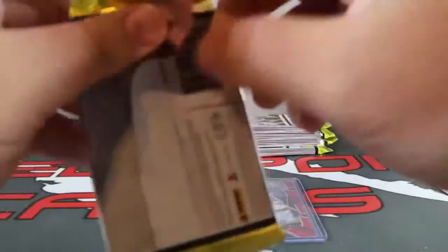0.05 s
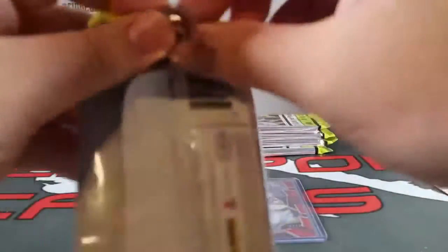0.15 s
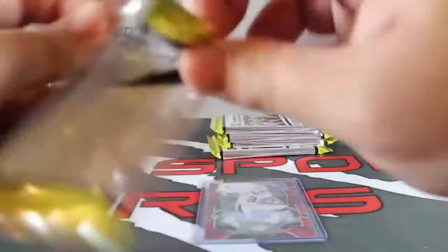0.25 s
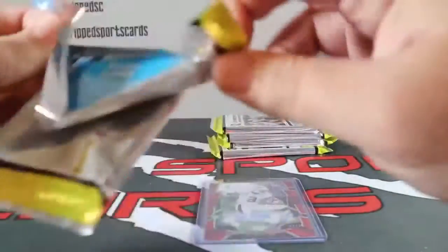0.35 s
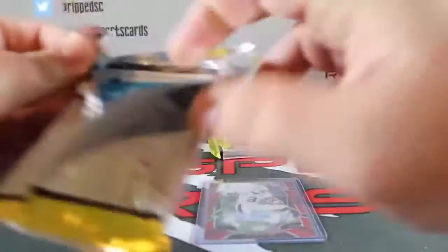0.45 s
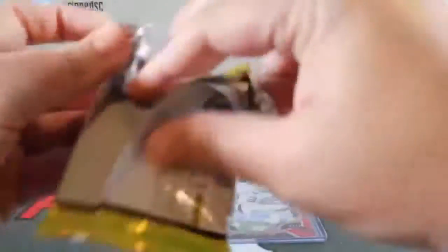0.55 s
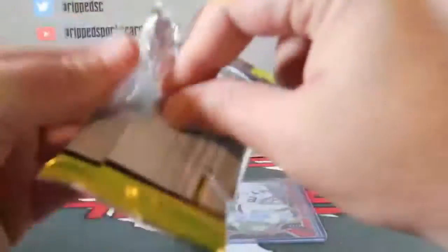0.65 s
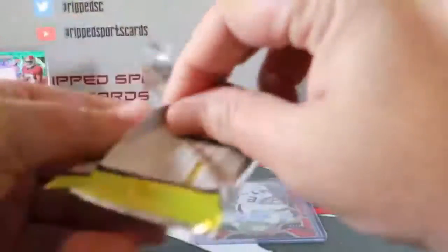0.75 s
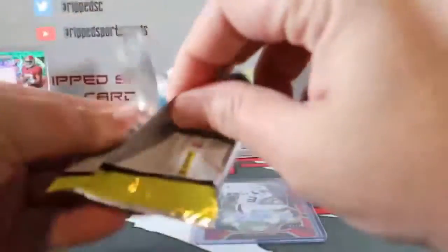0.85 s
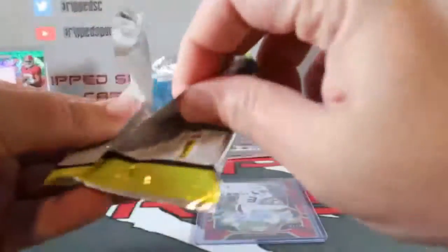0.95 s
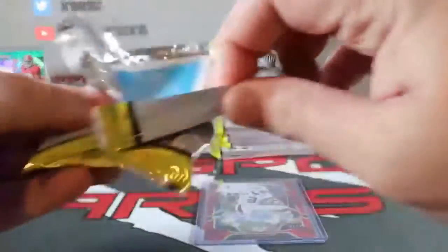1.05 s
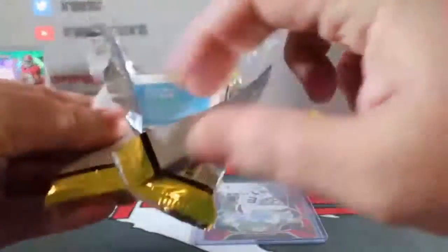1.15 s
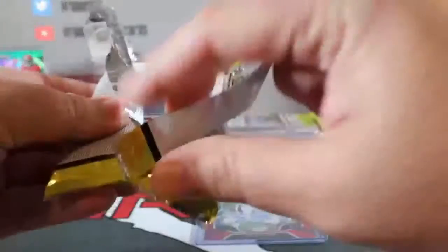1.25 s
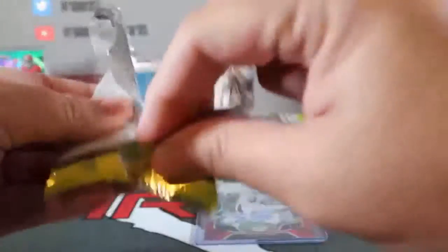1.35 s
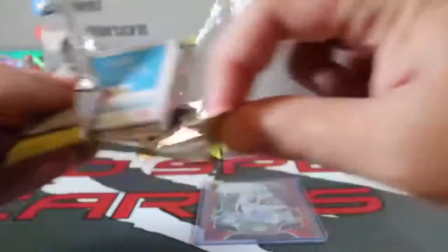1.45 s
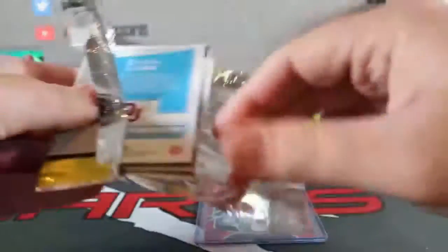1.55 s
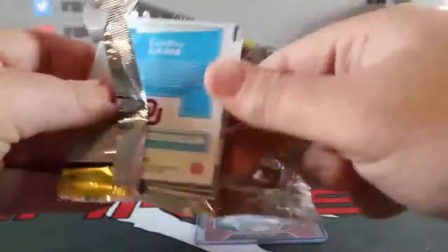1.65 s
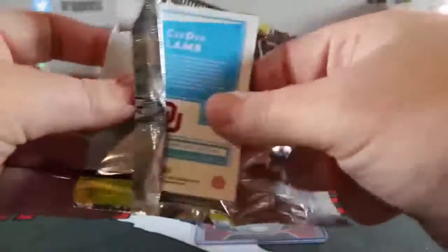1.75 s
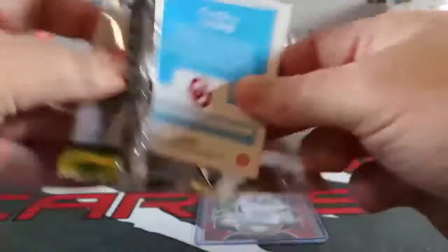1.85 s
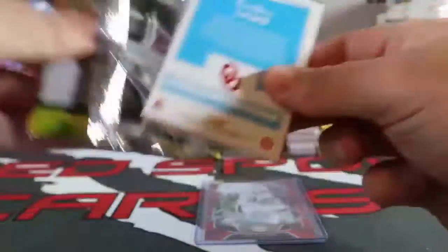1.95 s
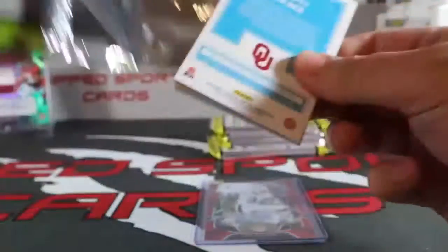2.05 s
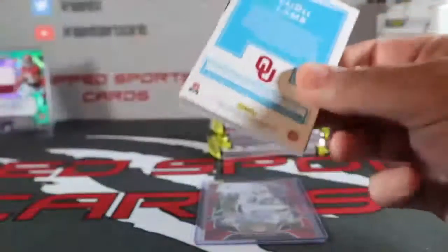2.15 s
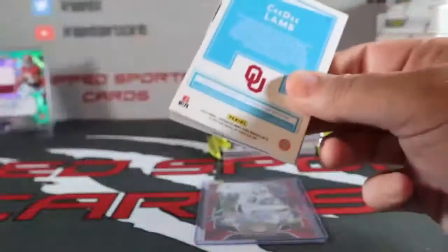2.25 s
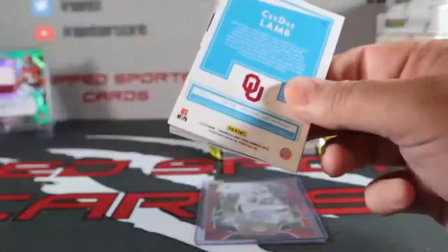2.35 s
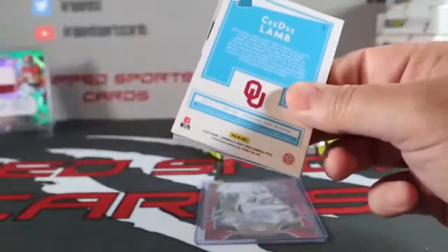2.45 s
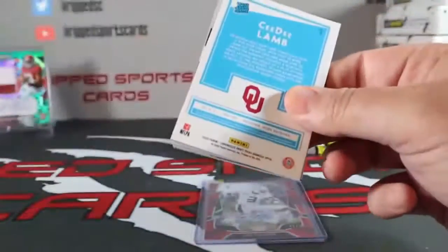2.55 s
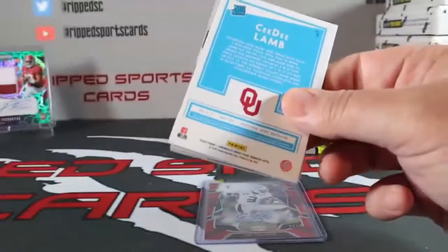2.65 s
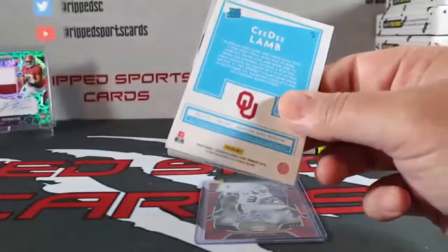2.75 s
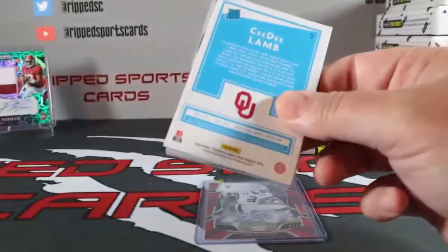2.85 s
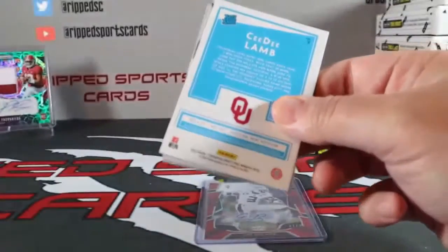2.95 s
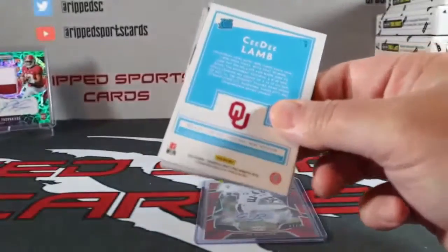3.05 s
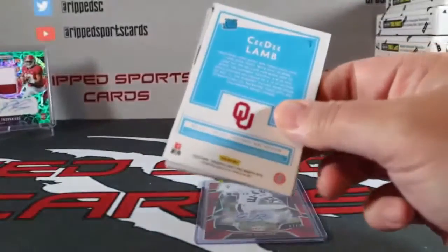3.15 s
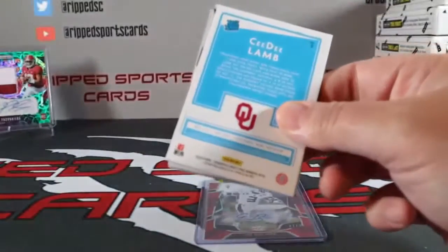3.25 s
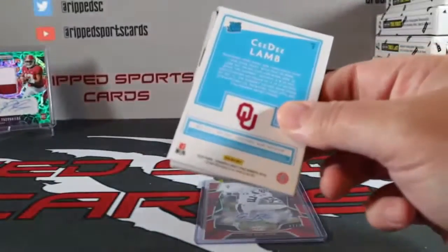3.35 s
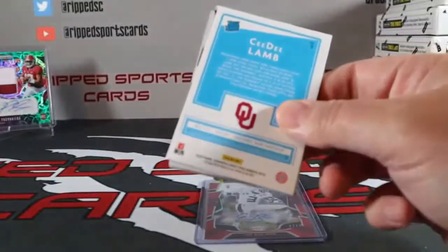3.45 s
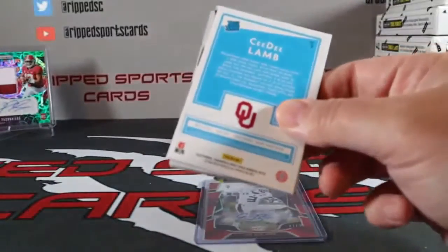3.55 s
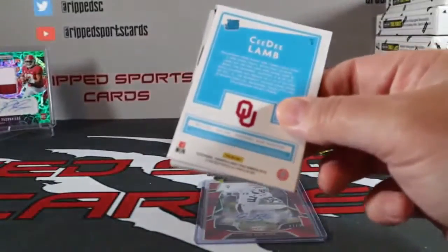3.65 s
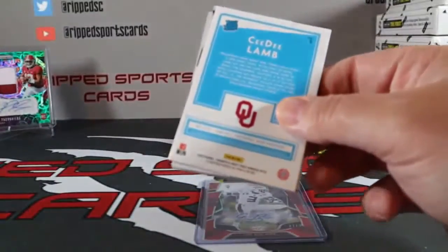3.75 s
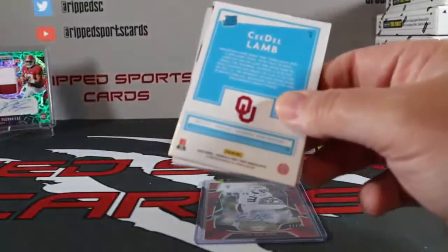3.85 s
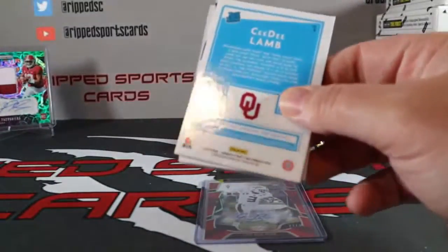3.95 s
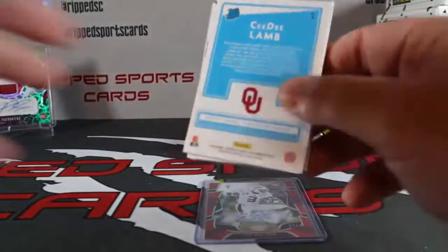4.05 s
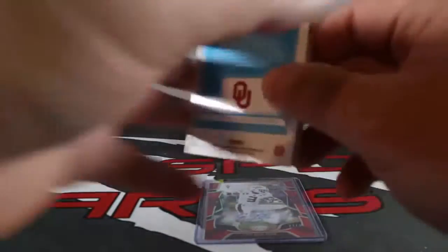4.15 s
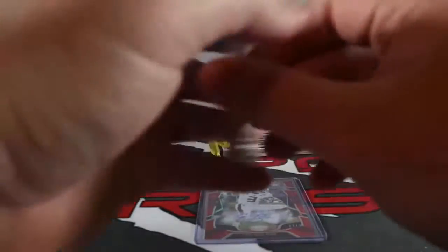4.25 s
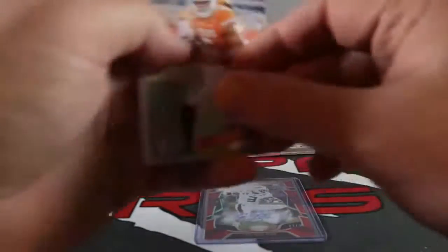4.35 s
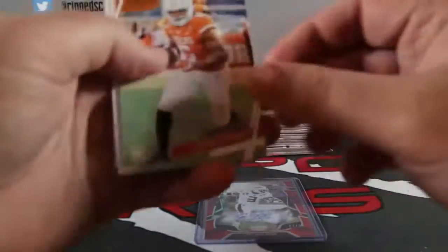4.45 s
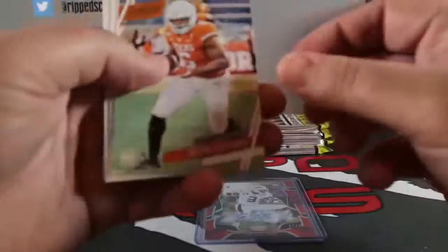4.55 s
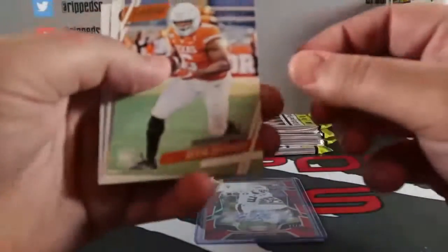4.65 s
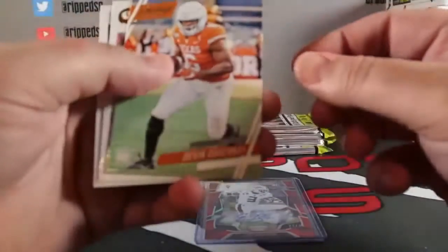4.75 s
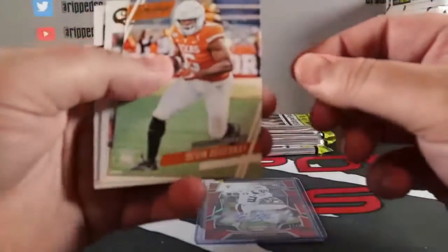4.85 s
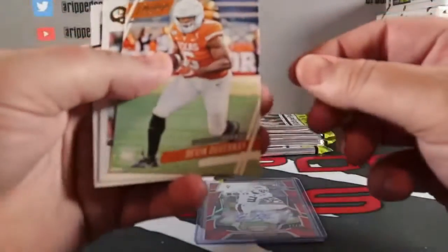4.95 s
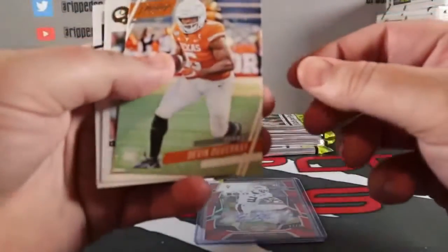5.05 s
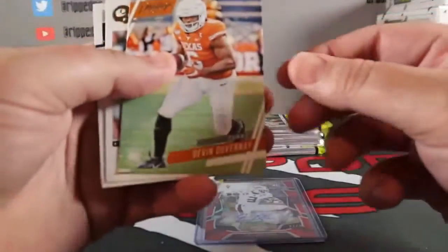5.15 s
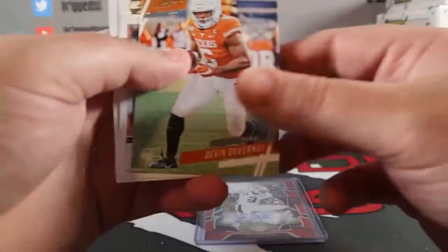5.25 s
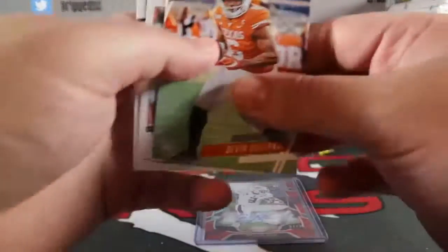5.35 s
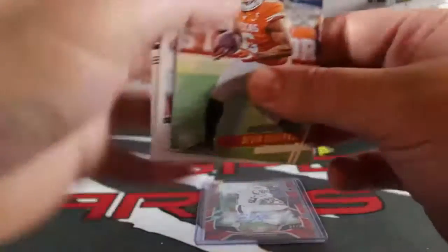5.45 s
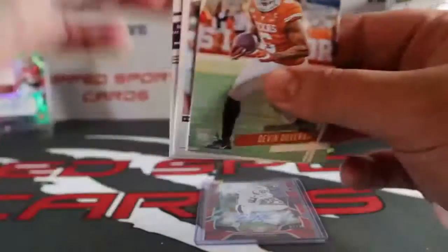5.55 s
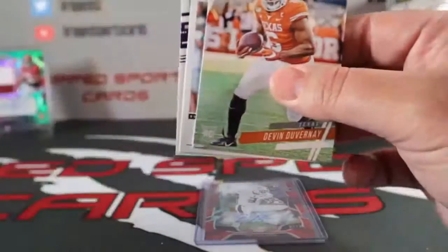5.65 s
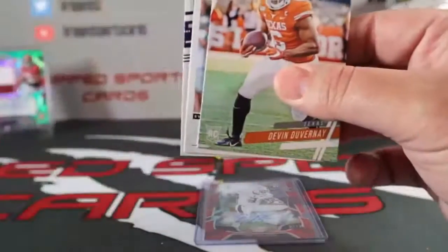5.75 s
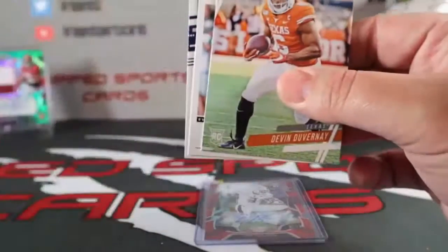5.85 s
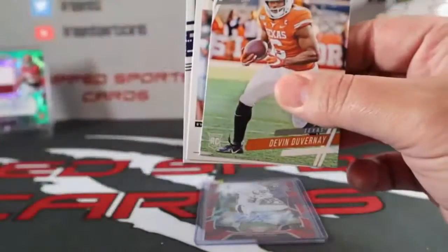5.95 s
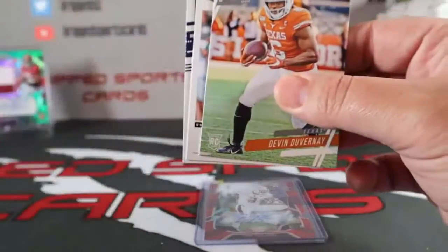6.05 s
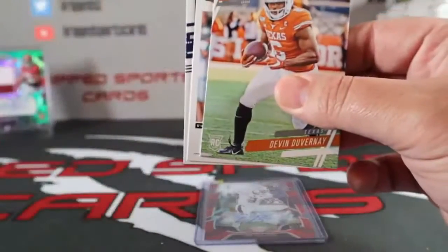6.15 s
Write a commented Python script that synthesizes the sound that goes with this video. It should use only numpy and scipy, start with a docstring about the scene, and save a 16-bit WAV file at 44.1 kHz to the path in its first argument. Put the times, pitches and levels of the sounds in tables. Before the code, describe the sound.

Loud, crisp foil crinkling opens the scene in uneven bursts, with hollow pouch rustle beneath the snaps. After about two seconds it gives way to quiet handling of stiff coated cards: ticks, a muffled double thud on the table, brief brushing slides and barely audible squeaks. The small room answers with short reflections; low room tone and a faraway motor hum remain, heard through a close phone.

```python
"""In a small room with a near wall, a foil card pack is torn open by hand close to a phone; a fan hums far off.
The film buckles in sharp snaps, each a filtered noise burst, over a dense crackle of decaying noise grains.
Then the cards are squared, tapped and slid: soft strokes of hiss, narrow squeaks, and thuds that ring a table.
Delayed copies and a decaying noise tail form the room's answer."""
import sys
import numpy as np
from scipy import signal
from scipy.fft import rfft, irfft, next_fast_len
from scipy.io import wavfile
from scipy.ndimage import uniform_filter1d, map_coordinates

SR = 44100
rng = np.random.default_rng(int(sys.argv[2]) if len(sys.argv) > 2 else 0)


def bounce(signal):
    """Save signal as a 16-bit WAV file at the path given by the first command-line argument."""
    frames = np.transpose(np.atleast_2d(signal))
    limited = np.clip(frames, -1, 1)
    pcm = np.round(limited * 32767).astype(np.int16)
    wavfile.write(sys.argv[1], SR, pcm)


N = 274294

# Colour of sound radiated by the thin surface. Each row: frequency in Hz, relative level in dB.
FILM = [(250, -39), (1300, -14.5), (2300, 0), (3200, -7), (4000, -1), (5200, -5), (6700, -2), (7700, -6),
        (8800, -2.5), (11000, -5), (15000, -7.5)]
# Resonances of the hollow pouch. Each row: frequency in Hz, relative level in dB.
POUCH = [(150, -40.5), (400, -12.5), (510, -15.5), (650, -7), (950, -3.5), (1300, 3), (1550, -4),
         (2200, -20.5)]


def amp(db):
    """Level to amplitude: 20 dB is a factor of ten."""
    return 10 ** (np.asarray(db) / 20)


def unit(x):
    """Normalisation to unit root-mean-square amplitude."""
    return x / np.sqrt(np.mean(x ** 2) + 1e-20)


def along(points, hz):
    """Interpolation of (Hz, value) points on a logarithmic frequency axis."""
    f, v = np.transpose(points)
    return np.interp(np.log(hz + 1), np.log(f + 1), v)


def wobble(rate):
    """Slow random modulation: a smooth curve through rate random knots a second."""
    knots = rng.standard_normal(int(N * rate / SR) + 4)
    return map_coordinates(knots, [np.arange(N) * rate / SR])


def filtered(x, response):
    """Linear filtering: the spectrum of x is multiplied by a function of frequency in Hz."""
    m = next_fast_len(x.shape[-1] + 8192)
    spectrum = rfft(x, m) * response(np.fft.rfftfreq(m, 1 / SR))
    return irfft(spectrum, m)[..., :x.shape[-1]]


def coloured(x, spectrum):
    """Minimum-phase filtering: a folded cepstrum gives the (Hz, dB) shape a causal response."""
    ceps = irfft(np.log(amp(along(spectrum, np.fft.rfftfreq(4096, 1 / SR)))))
    ceps[1:2048] *= 2
    ceps[2049:] = 0
    impulse_response = irfft(np.exp(rfft(ceps)))
    return signal.fftconvolve(x, impulse_response)[:len(x)]


def treble(x, above_hz):
    """High-pass filtering: the top part of x alone."""
    return filtered(x, lambda hz: 1 / (1 + (above_hz / (hz + 1)) ** 4))


def stroke(start, swell, fade):
    """Envelope of a gesture: a smooth swell, then a near-exponential death of 60 dB within fade (all s)."""
    t = np.arange(N) / SR - start
    rise = np.sin(np.pi / 2 * np.clip(t / abs(swell), 0, 1)) ** 2
    since_peak = np.clip(t - abs(swell), 0, None)
    return rise * amp(-60 * (since_peak / abs(fade)) ** 1.069)


def patchy(x, depth_db):
    """Varying resonance: colour drifts in narrow streaks, as parts of a surface ring for a while."""
    z = signal.stft(x, nperseg=512)[2]
    field = uniform_filter1d(rng.standard_normal(z.shape), size=4, axis=0)  # across frequency
    field = uniform_filter1d(field, size=9, axis=1)  # across time
    return signal.istft(z * amp(depth_db * unit(field)), nperseg=512)[1][:N]


def grains(per_s, spread_db, life_s, clump_db):
    """Stick-slip friction: tiny slips at random moments make noise that decays to 1/e in life_s."""
    sizes_db = spread_db * np.minimum(rng.exponential(size=N), 3)
    kicks = (rng.random(N) < per_s / SR) * amp(sizes_db)
    shape = signal.lfilter([1], [1, -np.exp(-1 / (abs(life_s) * SR))], kicks)
    return unit(shape * amp(clump_db * wobble(45)) * rng.standard_normal(N))


def clicks(rows, focus, gain_db, boom_db):
    """Impulsive excitation: a sharp crack and weaker rattle peak round a centre and boom in the hollow."""
    crack_s, rattle_s, rattle_db = .004, .016, -10  # times to die 60 dB; rattle re crack
    skin, body, t = np.zeros(N + SR), np.zeros(N + SR), np.arange(SR // 40) / SR
    decay = amp(-60 * t / crack_s) + amp(rattle_db - 60 * t / rattle_s)
    shape = (1 - np.exp(-t / .0002)) * decay
    for s, db, centre_hz in rows:
        burst = shape * rng.standard_normal((2, len(t)))
        tone = signal.lfilter(*signal.iirpeak(centre_hz, focus, SR), burst[0]) + 0.4 * burst[0]
        at = round(s * SR)
        skin[at:][:len(t)] += amp(db) * tone / np.linalg.norm(tone)
        body[at:][:len(t)] += amp(db) * burst[1] / np.linalg.norm(burst[1])
    return amp(gain_db) * coloured(skin[:N], FILM) + amp(boom_db) * coloured(body[:N], POUCH)


def background():
    """Steady broadband and tonal noise: stirring room tone, wavering motor hum, rumble through the phone stand."""
    # Room tone. Each row: frequency in Hz, relative spectral level in dB.
    air_colour = [(24, -34), (60, -8), (124, -8), (199, -13), (290, -11), (372, -18.5), (479, -15),
                  (700, -23), (1300, -26.5), (2000, -34.5), (3300, -40.5), (7500, -43), (9000, -41),
                  (16000, -41.5)]
    # Motor partials. Each row: frequency in Hz, level in dB before a common 4 dB gain.
    hum_partials = [(123.8, -76.5), (484.5, -85), (620, -86.5)]
    # The phone is jostled. Each row: start in seconds, rumble level in dB.
    jolts = [(.15, -48), (.85, -65), (1.0, -65), (1.42, -59), (4.2, -75), (5.2, -74), (5.95, -67)]
    air_db = -69
    stir = patchy(rng.standard_normal(N), depth_db=1.5)
    air = unit(filtered(stir, lambda hz: amp(along(air_colour, hz))))
    air = amp(air_db + 4.2 * wobble(7)) * air
    turn = 2 * np.pi * np.arange(N) / SR  # phase of 1 Hz
    hum = sum(amp(db + 4 + 1 * wobble(5.6)) * np.sin(hz * turn + 0.89 * wobble(1.7)) for hz, db in hum_partials)
    rumble = unit(filtered(rng.standard_normal(N), lambda hz: hz / (hz + 15) / (1 + (hz / 36) ** 6)))
    jostling = sum(amp(db) * stroke(s, swell=0.072, fade=0.3) for s, db in jolts)
    return air + hum + rumble * (amp(-90) + jostling)


def foil():
    """Buckling of a thin film: snaps stand out of a crackle of creases, heard through film and hollow pouch."""
    # The hands pull, tear and crush the foil.
    # Each row: start in seconds, crackle level in dB, fade in seconds, pouch boom re crackle in dB.
    pulls = [(-.02, -30.5, 0.17, -8.5), (.044, -34.5, 1, -17.5), (.104, -23, 0.63, -8),
             (.178, -17.5, 0.14, -2), (.208, -22, 0.073, -3.5), (.3, -52, 0.094, -20),
             (.383, -30, 0.52, -7), (.461, -36.5, 0.21, -10), (.58, -37, 0.37, -6.5), (.65, -42.5, 1, -8),
             (.742, -38, 0.065, 1), (0.84, -27, 0.3, -5), (.875, -19, 0.31, -1.5), (.905, -21.5, 0.054, 4),
             (1.024, -35.5, 0.24, 4.5), (1.152, -44, .2, -1.5), (1.195, -27.5, 0.33, -9.5),
             (1.264, -22, 0.46, -5), (1.333, -20.5, 0.3, -1.5), (1.439, -33.5, 0.18, -2),
             (1.508, -31, 0.21, -5), (1.57, -35.5, 0.24, -17), (1.72, -39.5, 0.44, -13),
             (1.802, -52, 0.54, -7.5), (1.84, -57.5, 0.13, 5.5), (1.95, -56.5, 0.35, -4),
             (2.107, -53, 0.15, -6.5)]
    # Single buckles. Each row: time in seconds, level in dB before the click gains, centre in Hz.
    snaps = [(0.0229, -23.5, 4350), (0.0313, -19.5, 5240), (0.0528, -19, 8120), (0.0663, -13.5, 8010),
             (0.0963, -10, 10500), (0.1084, -9.5, 8410), (0.1166, -2.5, 7500), (0.1690, -6.5, 3960),
             (0.1850, 0, 3978), (0.3448, -22, 5230), (0.3869, -11, 4300), (0.3982, -15, 5400),
             (0.4134, -30, 6030), (0.4259, -14, 4260), (0.4765, -10, 2720), (0.4985, -15, 3385),
             (0.5279, -18.5, 6100), (0.5935, -15.5, 9700), (0.6320, -12.5, 6530), (0.6617, -10, 4285),
             (0.6985, -12.5, 8100), (0.7270, -18, 2716), (0.7544, -21, 4000), (0.7675, -16, 3216),
             (0.8042, -24.5, 4190), (0.8487, -13.5, 5200), (0.8574, -14.5, 6300), (0.8722, -8.5, 2606),
             (0.9404, -6.5, 8677), (0.9619, -10.5, 8070), (1.0432, -14.5, 5640), (1.0676, -10.5, 3703),
             (1.1727, -23.5, 6200), (1.1902, -12, 5646), (1.2140, -12.5, 2993), (1.2344, -12.5, 8080),
             (1.2565, -11.5, 6996), (1.2648, -14, 5640), (1.3301, 0, 7420), (1.3420, -6, 3300),
             (1.3522, -3, 5450), (1.3592, -3, 8000), (1.4502, -13, 5960), (1.5157, -4, 7090),
             (1.6735, -38, 4500), (1.7188, -10.5, 8200), (2.0097, -29.5, 9300), (2.2085, -54, 2870)]
    pull_swell_s, streak_db = .018, 4
    # treble re crackle; the empty wrapper is carried off and dulls
    bright_db, away_s, dulls_db_per_s = -1.1, 1.75, 74
    # harder pulls tear the seam: over this span the crackle fuses into a rip
    rip_from_db, rip_span_db = -31, 17.5

    def creases():
        return patchy(grains(per_s=460, spread_db=2.0, life_s=0.00066, clump_db=2.5), depth_db=streak_db)

    def tearing():
        return patchy(grains(per_s=2900, spread_db=3.5, life_s=0.0014, clump_db=1.0), depth_db=streak_db)

    # creases of each size pop at their own moments and pitch
    mixed = np.zeros(N)
    for centre_hz in (2300, 5500, 13000):
        mixed += filtered(creases(), lambda hz: np.exp(-np.log((hz + 1) / centre_hz) ** 2 / .6))
    skin, boom = unit(coloured(mixed, FILM)), unit(coloured(creases(), POUCH))
    top = treble(skin, above_hz=7000)
    away_for_s = np.clip(np.arange(N) / SR - away_s, 0, None)
    top_gain = amp(bright_db - dulls_db_per_s * away_for_s)
    skin = skin + (top_gain - 1) * top
    rip, rip_boom = unit(coloured(tearing(), FILM)), unit(coloured(tearing(), POUCH))

    crackle = np.zeros(N)
    for s, db, fade, boom_db in pulls:
        share = np.clip((db - rip_from_db) / rip_span_db, 0, 1)  # of the power that is rip
        surface = skin * np.sqrt(1 - share) + rip * np.sqrt(share)
        hollow = boom * np.sqrt(1 - share) + rip_boom * np.sqrt(share)
        crackle += amp(db) * stroke(s, pull_swell_s, fade) * (surface + amp(boom_db) * hollow)
    return crackle + clicks(snaps, focus=3.7, gain_db=14, boom_db=7.5)


def table():
    """Impact on a resonant plate: soft blows of flesh, short dull scuffles, thud and ring the table top."""
    # A hand or the pack knocks the table. Each row: time in seconds, level in dB before gain and filters.
    knocks = [(0.185, -28), (0.901, -32), (1.06, -29.5), (1.337, -22.5), (2.113, -43.5), (3.079, -69),
              (3.658, -42), (3.742, -31), (3.757, -26.5), (3.781, -31.5), (3.935, -54), (4.068, -57),
              (4.427, -51), (4.457, -59.5), (5.365, -42), (5.501, -45), (6.06, -49)]
    # Modes of the table top. Each row: frequency in Hz, bandwidth in Hz, level in dB.
    modes = [(188, 107, -18), (399, 60, 4), (807, 65, -3), (1032, 37, -1.5), (1378, 354, -13)]
    push, t = np.zeros(N + SR), np.arange(SR // 4) / SR
    for s, db in knocks:
        envelope = amp(db + 22.5 - 60 * t / 0.058) * (1 - np.exp(-t / 0.0045))
        push[round(s * SR):][:len(t)] += envelope * rng.standard_normal(len(t))
    dull = signal.lfilter(*signal.butter(2, 700, fs=SR), push[:N])

    def wood_and_thud(f):
        wood = 0
        for k, (centre, width, db) in enumerate(modes):
            resonance = 1j * f * width / (centre * centre - f * f + 1j * f * width)
            wood = wood + (-1) ** k * amp(db) * resonance  # neighbours in opposite phase
        return wood + 0.21 * (f / (f + 250)) ** 2  # the blow itself

    return filtered(dull, wood_and_thud)


def cards():
    """Sliding friction: coated cards hiss finely, the stack sounds where the grip leaves it free, edges tick and squeak."""
    # Cards slide on each other. Each row: start in seconds, hiss level in dB, swell in seconds,
    # stack band in Hz, stack level re hiss in dB, treble gain of the hiss in dB.
    slides = [(2.486, -47.5, 0.01, 3770, -22, -27), (2.549, -53.5, 0.0063, 3980, -28, -36),
              (2.704, -41, 0.019, 1470, -4, -1), (2.9, -69.5, 0.1, 1234, 1.5, -5),
              (3.264, -64, 0.022, 3820, -19.5, -24), (3.615, -56.5, 0.034, 1885, -11, -1),
              (3.651, -47, 0.025, 1205, 1, -12), (3.734, -60, 0.039, 1350, 15.5, -14),
              (4.04, -75.5, 0.067, 4120, -6, -14), (4.13, -64.5, 0.028, 1370, -4, -6),
              (4.26, -72.5, .05, 2980, -3, -21), (4.365, -57, 0.016, 2340, -2, -24),
              (4.394, -56.5, 0.013, 2080, 5.5, -24), (4.499, -62.5, 0.0093, 1460, 2, 6),
              (5.04, -75.5, 0.12, 2078, -7, 1), (5.3, -56, 0.084, 847, -3, -1),
              (5.37, -59, 0.067, 1420, 3.5, 3.5), (5.476, -50, 0.022, 900, 0, -2),
              (5.94, -58.5, 0.068, 3600, -5.5, -1), (6.023, -46.5, 0.033, 3270, -10, -5.5)]
    # Card edges tick. Each row: time in seconds, level in dB before the click gains, centre in Hz.
    ticks = [(2.4825, -33, 6840), (2.5493, -39, 3830), (2.7015, -40, 8900), (4.415, -33.5, 1600),
             (4.4957, -50.5, 8660), (5.502, -40.5, 3700), (6.0541, -28, 3465)]
    # An edge squeaks faintly as it is drawn off the stack.
    # Each row: start in seconds, level in dB, swell in seconds, frequency in Hz.
    squeaks = [(4.29, -68, .045, 1234), (5.09, -76, .03, 2060), (5.2, -69, .05, 3450),
               (5.26, -66, 0.1, 3420), (5.24, -64, .1, 1263), (5.55, -74, .07, 1270)]
    slide_fade_s, fade_per_swell = 0.053, 4.04  # a slow slide also dies slowly
    squeak_fade_per_swell = 2.8

    def rub():
        return patchy(grains(per_s=2100, spread_db=9.0, life_s=0.0036, clump_db=-2.0), depth_db=3.5)

    skin, stack = unit(coloured(rub(), FILM)), rub()
    top = treble(skin, above_hz=7700)
    hiss = np.zeros(N)
    for s, db, swell, body_hz, body_db, bright_db in slides:
        band = [body_hz / 1.37, body_hz * 1.02]
        body = unit(signal.sosfilt(signal.butter(2, band, "bandpass", fs=SR, output="sos"), stack))
        shape = stroke(s, swell, slide_fade_s + fade_per_swell * swell)
        hiss += amp(db) * shape * (skin + (amp(bright_db) - 1) * top + amp(body_db) * body)

    squeak = np.zeros(N)
    for s, db, swell, centre_hz in squeaks:
        narrow = filtered(rng.standard_normal(N), lambda hz: 1 / (1 + ((hz - centre_hz) / 45) ** 2))
        squeak += amp(db) * stroke(s, swell, squeak_fade_per_swell * swell) * unit(narrow)
    return hiss + squeak + clicks(ticks, focus=3.2, gain_db=14, boom_db=14.5)


def room(x, wet_db):
    """Reflection and reverberation: near walls give copies; a later noise tail, redrawn often, dies away."""
    # Early reflections. Each row: delay in seconds, level in dB.
    walls = [(.0085, -10), (0.0176, -17), (.031, -22)]
    # Reverberation. Each row: frequency in Hz, time to decay 60 dB in seconds.
    decay_times = [(200, 0.41), (1300, 0.16), (5000, 0.18), (14000, 0.082)]
    out = x + sum(amp(db) * np.pad(x, (round(s * SR), 0))[:N] for s, db in walls)
    hop = SR // 4  # each quarter second excites its own tail
    for start in range(0, N, hop):
        hz, t, z = signal.stft(rng.standard_normal(SR // 2), SR, nperseg=256)
        decay = amp(-60 * t / along(decay_times, hz)[:, None])
        tail = signal.istft(z * decay, SR, nperseg=256)[1]
        tail = np.pad(tail / np.linalg.norm(tail), (300, 0))  # delayed by 300 samples
        late = signal.fftconvolve(x[start:start + hop], tail)
        out[start:][:len(late)] += amp(wet_db) * late[:N - start]
    return out


def scene():
    """Superposition: everything handled is heard in the room, over its tone."""
    tone = background()
    handled = foil() + table() + cards()
    return (room(handled, wet_db=-7.5) + tone)[None]


def record(dry):
    """Band limiting: the phone keeps almost nothing above a steep upper cutoff."""
    top_hz = 15850
    return filtered(dry, lambda hz: 1 / (1 + (hz / top_hz) ** 600))


dry = scene()
out = record(dry)
bounce(out)
```